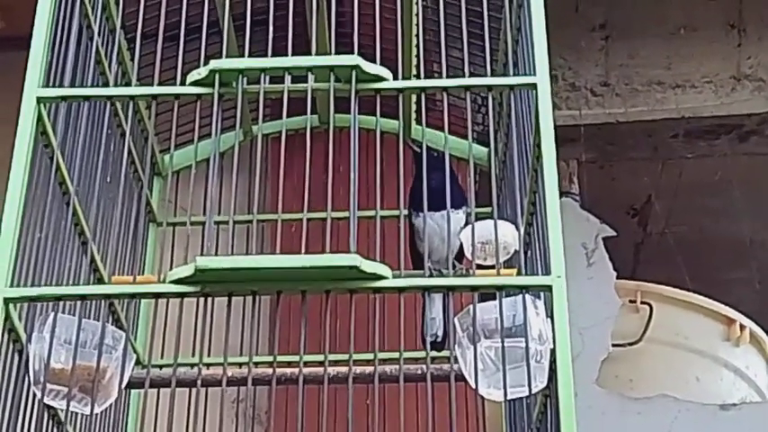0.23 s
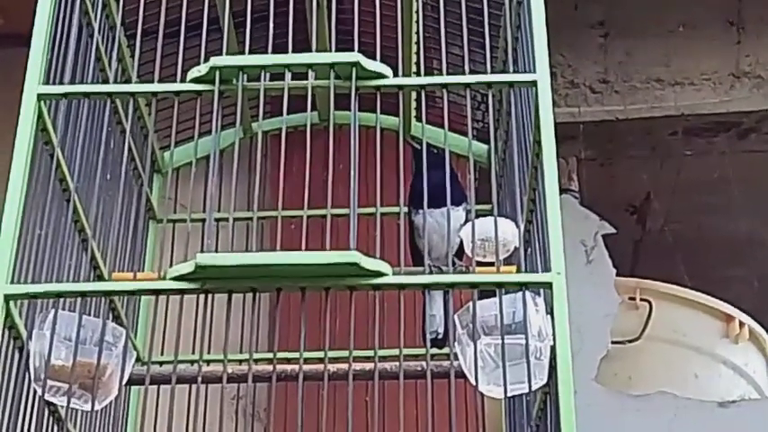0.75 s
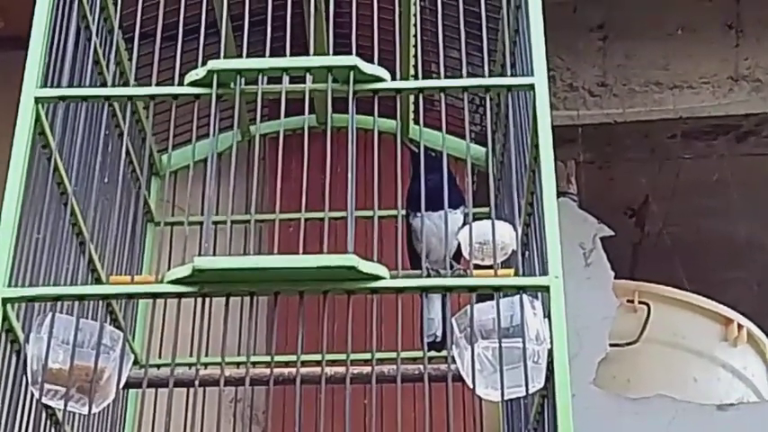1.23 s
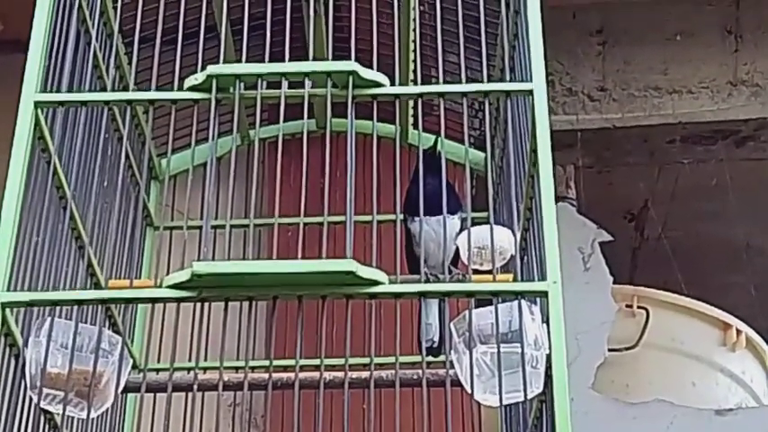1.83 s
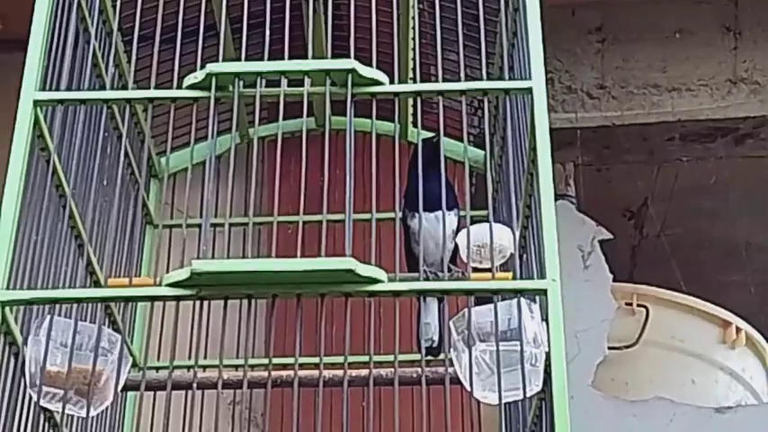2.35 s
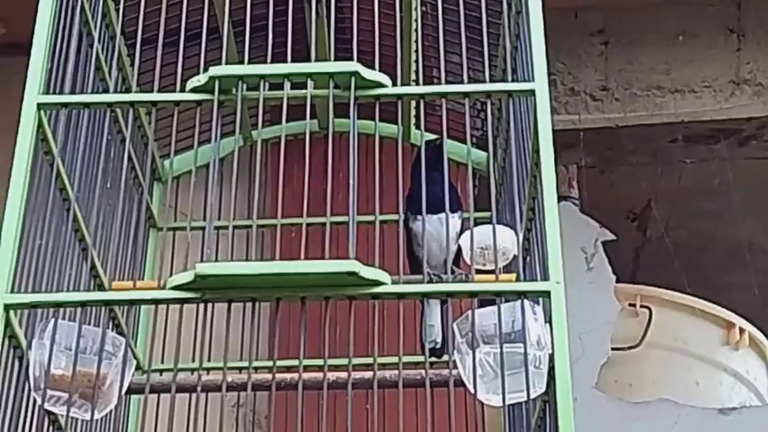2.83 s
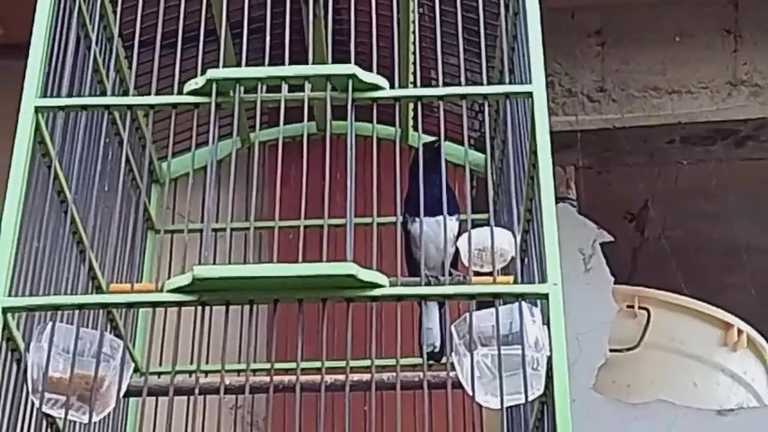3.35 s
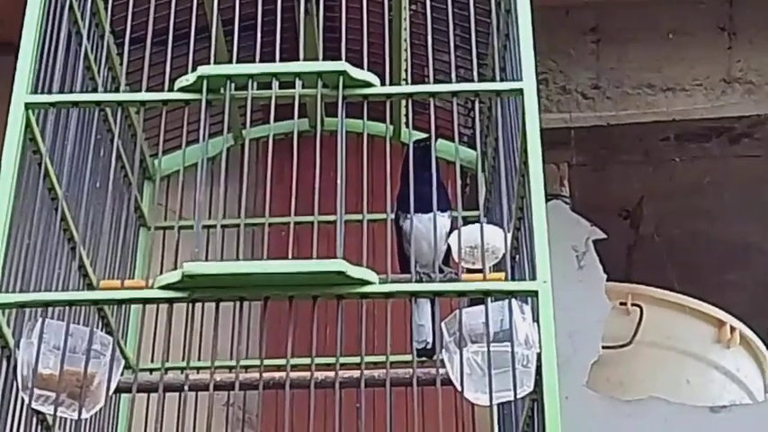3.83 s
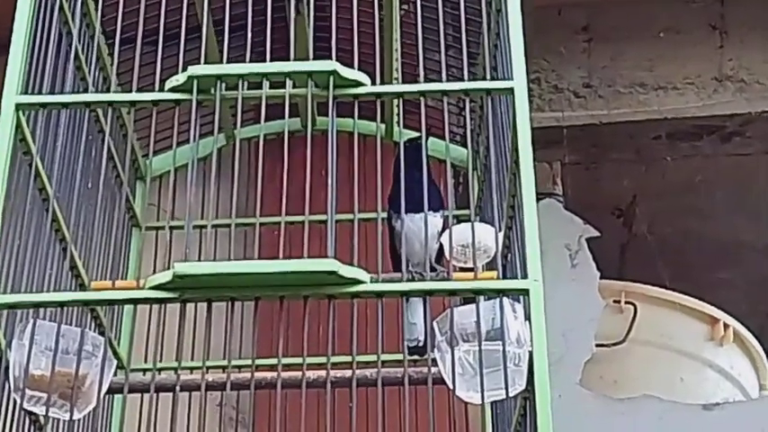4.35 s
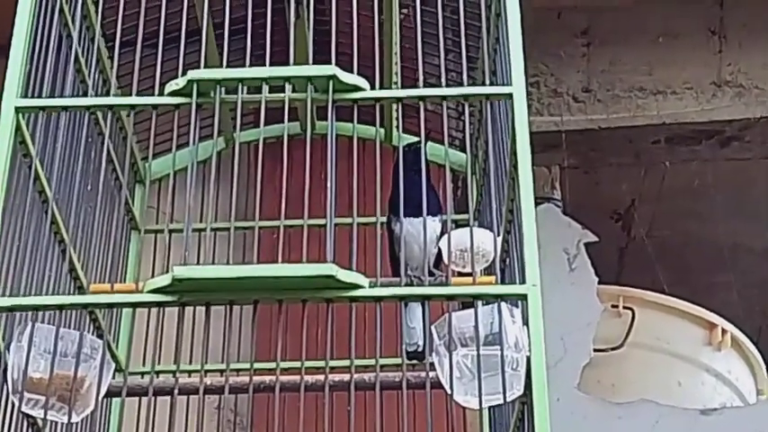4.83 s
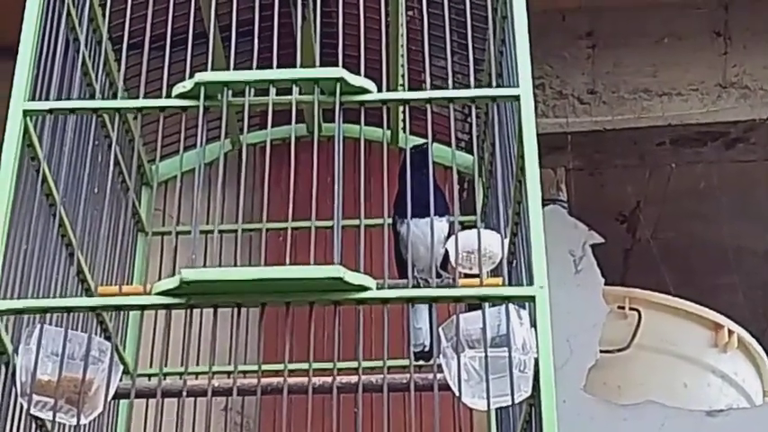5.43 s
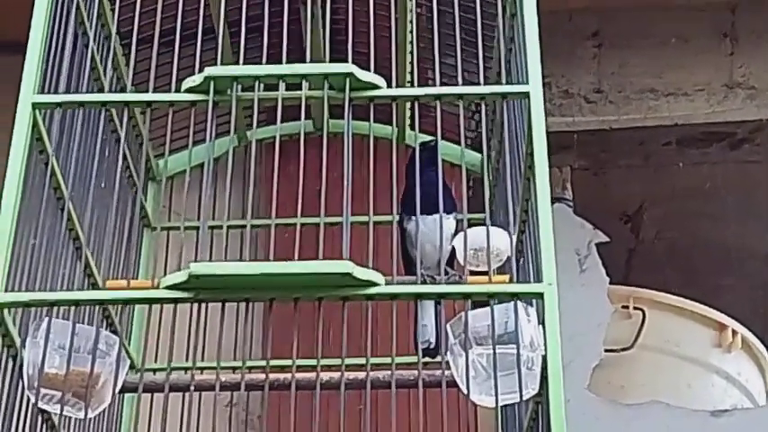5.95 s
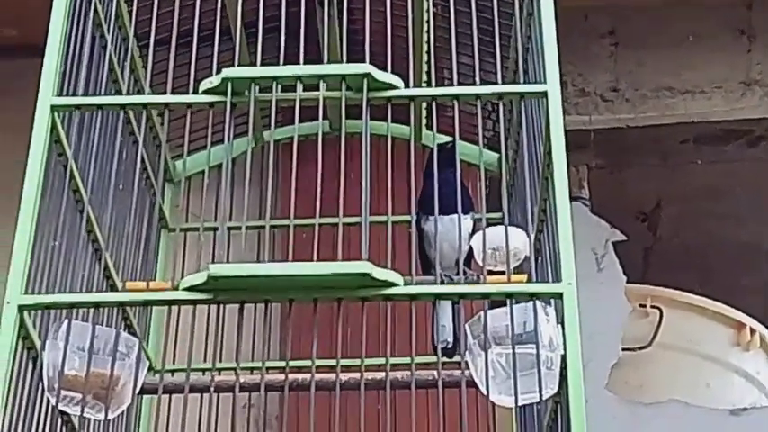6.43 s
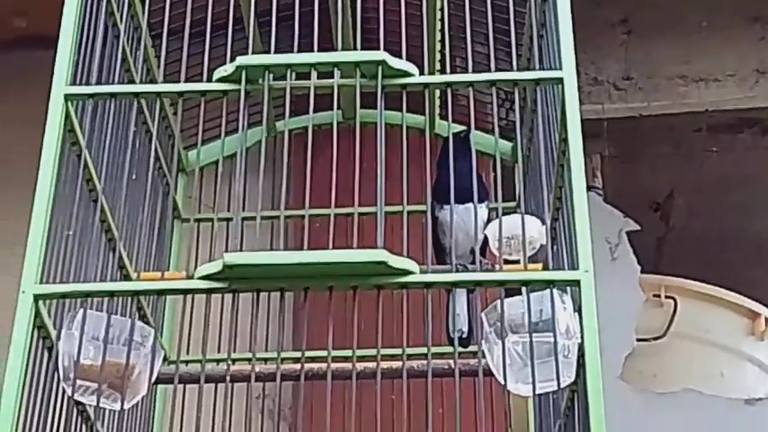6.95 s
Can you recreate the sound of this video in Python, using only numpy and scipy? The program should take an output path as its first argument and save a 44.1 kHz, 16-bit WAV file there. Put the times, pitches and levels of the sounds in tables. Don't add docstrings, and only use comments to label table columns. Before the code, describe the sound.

Water drips and far birds call softly, then a close bird bursts into piercing gliding whistles and warbles before quiet returns.

```python
import sys
import numpy as np
from scipy import signal
from scipy.fft import rfft, irfft
from scipy.io import wavfile
from scipy.ndimage import uniform_filter1d

SR = 44100
rng = np.random.default_rng(int(sys.argv[2]) if len(sys.argv) > 2 else 0)


def boost(x):
    u = np.asarray(x, float) / 20
    return 10 ** u


def wav_out(sig):
    wavfile.write(sys.argv[1], SR, np.round(np.clip(np.atleast_2d(sig).T, -1, 1) * 32767).astype(np.int16))


N = 317079


def rms_one(x):
    return x / np.sqrt(np.mean(x ** 2) + 1e-20)


def drift(rate_hz):
    r = np.exp(-2 * np.pi * rate_hz / SR)
    white = rng.standard_normal(N + SR)
    return rms_one(signal.lfilter([1], [1, -2 * r, r * r], white)[SR:])


def resonance(x, hz, width_hz):
    r = np.exp(-np.pi * width_hz / SR)
    poles = [1, -2 * r * np.cos(2 * np.pi * hz / SR), r * r]
    return signal.lfilter([(1 - r * r) / 2, 0, (r * r - 1) / 2], poles, x)


def double_resonance(x, hz, width_hz):
    return resonance(resonance(x, hz, width_hz), hz, width_hz)


def butter(x, order, hz, kind="low"):
    return signal.sosfilt(signal.butter(order, hz, kind, fs=SR, output="sos"), x)


def add(out, s, x):
    i = round(s * SR)
    out[i:i + len(x)] += x[:N - i]


def yard_noise():
    # frequency in Hz, density in dB per Hz.
    spectrum = [(25, -39), (165, -31.5), (190, -20), (345, -13), (600, -20.5), (1300, -24), (2600, -15.5),
                (3500, -23), (4300, -28), (6200, -28.5), (8600, -31.5), (9700, -41.5), (13000, -59.5),
                (15000, -46.5)]
    hz = np.arange(N // 2 + 1) * SR / N + 1
    point_hz, point_db = np.transpose(spectrum)
    colour = boost(np.interp(np.log(hz), np.log(point_hz), point_db))
    noise = rms_one(irfft(rfft(rng.standard_normal(N)) * colour, N))
    treble = butter(noise, 3, 3600, "high")
    patchy_db = 3 * drift(4.5)
    return noise + treble * (boost(patchy_db) - 1)


def far_chatter():
    out = np.zeros(N)
    for hz in (1500, 2100, 2600, 3050, 3300):
        out += double_resonance(rng.standard_normal(N), hz, 450) * boost(5 * drift(9))
    return rms_one(out)


def pump():
    hum = rms_one(resonance(rng.standard_normal(N), 340.7, 11))
    hum += .36 * rms_one(double_resonance(rng.standard_normal(N), 190, 14))
    return hum + .13 * rms_one(resonance(rng.standard_normal(N), 85, 70))


def background():
    hiss = rms_one(resonance(rng.standard_normal(N), 15100, 1300))
    return boost(-58.5) * yard_noise() + boost(-63.5) * far_chatter() + boost(-67.5) * pump() + boost(-81.5) * hiss


def cicada():
    # time in seconds, level in dB.
    swell = [(0.0, -59.5), (0.72, -59), (0.8, -68), (1.03, -68.5), (1.1, -58.5), (1.9, -60), (1.97, -65),
             (2.3, -61.5), (3.9, -58), (4.14, -67.5), (4.75, -59.5), (5.55, -62), (5.65, -61.5),
             (6.45, -58), (6.6, -68), (6.92, -59), (7.0, -59)]
    # frequency in Hz, width in Hz, level in dB.
    modes = [
        (7560, 330, 3.5),
        (7280, 1000, 1),
        (7790, 510, -4.5),
        (6920, 530, -17),
    ]
    t = np.arange(N) / SR
    burst_hz = 121 * (1 + .03 * drift(8))
    throb = 1 + .4 * np.sin(2 * np.pi * np.cumsum(burst_hz) / SR)
    clicks = rng.standard_normal(N) * throb
    body = sum(boost(db) * rms_one(double_resonance(clicks, hz, 2 * width)) for hz, width, db in modes)
    body = signal.sosfilt(signal.cheby1(8, 1, 8450, fs=SR, output="sos"), body)
    return boost(np.interp(t, *np.transpose(swell))) * rms_one(body)


def bubble(hz, db, slap, cycles):
    t = np.arange(len(slap)) / SR
    decay = boost(-60 * t * hz / cycles)
    ring = np.sin(2 * np.pi * hz * (t + 0.43 * t * t)) * decay
    return boost(db) * (ring + slap * np.exp(-t / .003))


def basin():
    # start in seconds, peak in dB, pitch in Hz.
    drips = [(0.056, -36.5, 1076), (0.476, -31, 817), (0.817, -36.5, 1002), (0.904, -36, 1820),
             (1.13, -32.5, 2150), (1.37, -43, 1770), (1.527, -41, 1830), (1.579, -36.5, 1740),
             (1.838, -43, 1435), (4.614, -35.5, 2326), (5.374, -29.5, 2300), (5.571, -43.5, 1523),
             (5.857, -27.5, 2470), (5.903, -37, 1930), (6.095, -45, 900), (6.13, -42, 1156),
             (6.532, -29, 1610), (5.532, -43.5, 1860), (5.665, -52, 930), (5.759, -51, 1520),
             (6.169, -43, 2340), (6.414, -42, 1300), (6.498, -42, 1490), (6.754, -39, 1930),
             (6.893, -36, 1127), (7.086, -40, 2180)]
    # start in seconds, level in dB, length in seconds, centre in Hz.
    splashes = [(0.062, -48, 0.12, 2790), (0.415, -51, 0.01, 3200), (0.478, -57, 0.092, 2750),
                (0.664, -57.5, 0.047, 2820), (0.722, -56.5, 0.02, 4930), (0.896, -56, 0.053, 2760),
                (1.47, -54.5, 0.02, 2930), (1.588, -60, 0.019, 4200), (1.884, -61.5, 0.017, 3970),
                (2.597, -55.5, 0.045, 1380), (2.9, -60, 0.027, 5500), (2.965, -45.5, 0.026, 1490),
                (5.006, -56.5, 0.035, 1106), (5.368, -49, 0.013, 2400), (5.763, -69, 0.11, 4200),
                (6.006, -60.5, 0.08, 4100), (6.196, -54, 0.027, 3100), (6.256, -58, 0.027, 4300),
                (6.3, -60, 0.037, 3400), (6.555, -57.5, 0.089, 4000), (6.958, -53, 0.016, 3900)]
    out = np.zeros(N)
    white = rng.standard_normal(N) * boost(2.4 * drift(170))
    slaps = rms_one(butter(white, 2, [700, 3600], "band"))
    for s, db, hz in drips:
        slap = (760 / hz) ** 1.5 * slaps[round(s * SR):][:4400]
        add(out, s, bubble(hz * .96, db - 5, slap, cycles=38.0))
    for when, pitch, size in rng.random((260, 3)):
        patter = bubble(900 * 4.5 ** pitch, -68 + 14 * size, 0.36 * slaps[:2000], cycles=30.0)
        add(out, when * N / SR, patter)
    for s, db, length, hz in splashes:
        t = np.arange(round(3 * length * SR)) / SR
        spray = rms_one(double_resonance(white[round(s * SR):][:len(t)], hz, 0.5 * hz))
        swell = np.clip(t / (.2 * length), 0, 1) * np.exp(-(t / length) ** 2)
        add(out, s, boost(db) * spray * swell)
    return butter(out, 3, [400, 6500], "band")


def whistles(notes, wobble, breath_db, reed_db):
    # multiple of the pitch, level in dB of a pure whistle, of a reedy note.
    upper_partials = [(3, -43.5, -20.5), (4, -51, -16.5), (5, -51, -32.5), (6, -65.5, -33.5),
                      (7, -70, -45.5), (8, -76, -45.5)]
    # pitch in Hz, level in dB.
    octave = [(1650, -23.5), (1950, -39), (2070, -52), (2300, -33.5), (2700, -48), (3000, -46), (3200, -63),
              (5500, -37.5)]
    # time in seconds, gain in dB.
    beak = [(2.1, -4), (2.35, -2.5), (2.52, 10), (2.56, -4), (3.0, 1), (3.1, 2.5), (3.2, 2), (3.3, 1),
            (3.55, -5.5), (3.58, -8.5), (3.68, -8), (3.84, 1.5), (3.9, -2), (4.03, 2), (4.25, 2),
            (4.55, -3.5), (4.75, -1), (4.95, -1)]
    sheen = np.tile(drift(18), 2)
    out, tremor = np.zeros(N), drift(130)
    air = resonance(rng.standard_normal(N), 270, 430)
    flutter = 1 + .45 * rms_one(air)
    for note in notes:
        s, hz, first_db, *given_db = np.transpose(note)
        if given_db:
            second_db = given_db[0]
        else:
            second_db = reed_db + 0.55 * first_db
            second_db = second_db + np.interp(hz, *np.transpose(octave))
            second_db = second_db + 0.59 * np.interp(s, *np.transpose(beak))
        n = np.arange(round(s[0] * SR), min(round(s[-1] * SR), N))
        curves = [np.interp(n / SR, s, c) for c in (hz, first_db, second_db)]
        hz, first_db, second_db = [uniform_filter1d(c, size=65, mode="nearest") for c in curves]
        phase = 2 * np.pi * np.cumsum(hz * (1 + wobble * tremor[n])) / SR
        reedy = np.clip((second_db - first_db + 25) / 22, 0, 1)
        grain = flutter[n]
        tone = boost(first_db) * np.sin(phase)
        tone += boost(second_db) * np.sin(2 * phase) * (1 + (grain - 1) * (1 - reedy))
        open_db = np.maximum(first_db, second_db) + np.interp(n / SR, *np.transpose(beak))
        for k, pure_db, reedy_db in upper_partials:
            k = round(k)
            dip_db = -16 * np.exp(-((k * hz - 6600) / 1200) ** 2)
            partial_db = open_db + dip_db + 3.5 * sheen[n + 997 * k]
            partial_db = partial_db + pure_db + reedy * (reedy_db - pure_db)
            tone += grain * boost(partial_db) * np.sin(k * phase) * (k * hz < 16500)
        tone *= 1 + boost(breath_db) * air[n]
        edge = np.clip(np.minimum(n - n[0], (n[-1] - n) / 5.6) / (0.00063 * SR), 0, 1)
        out[n] += np.sqrt(2) * edge * tone
    return out


def glides(rows, swell_db):
    return [[(s, first_hz, db), (s + length, last_hz, db + swell_db)]
            for s, length, first_hz, last_hz, db in rows]


def far_birds():
    # time in seconds, pitch in Hz, level in dB.
    neighbours = [
        [(0.2, 2150, -57.5), (0.33, 2623, -59), (0.4, 2606, -39.5), (0.43, 2510, -49.5), (0.45, 2180, -40)],
        [(5.15, 2014, -50), (5.25, 1906, -57), (5.3, 1563, -68)],
        [(5.8, 2466, -55), (5.83, 2262, -47.5), (5.9, 2388, -52), (5.95, 2070, -71)],
        [(.32, 2840, -47), (.345, 2515, -57), (.38, 2460, -34)],
        [(5.86, 2750, -62), (5.9, 2577, -48.5), (5.93, 2172, -46)],
    ]
    # time in seconds, pitch in Hz, level in dB.
    risers = [
        [(0.99, 1740, -54), (1.07, 2036, -50.5), (1.15, 2330, -43.5), (1.23, 2402, -41.5), (1.31, 2694, -39.5),
         (1.38, 2602, -57)],
        [(6.475, 1730, -57.5), (6.56, 1943, -49.5), (6.63, 2297, -41), (6.74, 2453, -46.5), (6.82, 2656, -42),
         (6.89, 2710, -57), (6.92, 2586, -64)],
    ]
    # time in seconds, pitch in Hz, first partial in dB, second partial in dB.
    hoarse = [
        [(3.48, 3030, -58.5, -65), (3.51, 2980, -46, -53), (3.545, 3020, -63, -50)],
        [(4.14, 2535, -40.5, -79), (4.2, 2820, -55, -59), (4.24, 2970, -27.5, -43)],
        [(6.36, 2944, -39, -60), (6.42, 2946, -39, -56.5), (6.47, 2614, -49, -51.5), (6.5, 2448, -50, -48),
         (6.55, 2610, -44.5, -48.5)],
        [(7.13, 2370, -51, -79), (7.16, 2600, -53.5, -64), (7.19, 2710, -40, -50)],
    ]
    # start in seconds, length in seconds, first Hz,
    # last Hz, level in dB.
    chirps = [(.001, .019, 1780, 1980, -50), (5.58, .035, 6800, 5000, -64), (5.82, .02, 5600, 4400, -66),
              (6.18, .09, 3270, 3200, -63), (6.77, .035, 6500, 4800, -66), (7.15, .04, 2300, 2250, -54),
              (5.75, .06, 4200, 4050, -66), (5.83, .06, 4450, 4000, -64), (6.05, .06, 4350, 4200, -65),
              (6.05, .08, 2850, 2500, -63), (5.97, .08, 2250, 2330, -60), (6.3, .09, 4350, 4250, -65),
              (6.66, .05, 4300, 4200, -66), (6.31, .04, 3050, 3300, -60), (6.99, .06, 2620, 2640, -60),
              (6.9, .05, 1050, 1350, -56), (.12, .06, 5200, 5600, -63)]
    calls = risers + neighbours + hoarse + glides(chirps, swell_db=-9)
    return butter(whistles(calls, wobble=0.0055, breath_db=-9, reed_db=-26.0), 1, 6500)


def legato(notes):
    out = []
    for note in sorted(notes):
        joined = False
        if out:
            start, end = note[0], out[-1][-1]
            meets = abs(start[0] - end[0]) < .004 and abs(start[1] / end[1] - 1) < .08
            joined = meets and len(start) == len(out[-1][0])
        if joined:
            out[-1] = out[-1] + [row for row in note[1:] if row[0] > end[0]]
        else:
            out.append(list(note))
    return out


def songbird():
    # time in seconds, pitch in Hz, level in dB.
    held = [
        [(2.056, 2660, -46.5), (2.075, 2518, -25), (2.12, 2655, -18.5), (2.165, 2826, -6.5), (2.25, 2750, -14),
         (2.32, 2692, -11), (2.38, 2589, -17), (2.44, 2430, -26), (2.485, 2168, -24)],
        [(3.085, 1856, -46.5), (3.097, 1903, -24.5), (3.11, 1990, -16.5), (3.13, 2064, -11),
         (3.195, 2080, -19.5), (3.205, 2050, -22)],
        [(3.268, 2260, -15), (3.28, 2570, -13), (3.29, 2614, 3.5), (3.3, 2440, -3.5), (3.32, 2546, -37.5),
         (3.35, 2540, -4), (3.41, 2636, -33.5), (3.445, 2660, -47.5)],
        [(4.452, 2540, -37.5), (4.47, 2600, -18), (4.58, 2798, -8), (4.64, 2686, -7), (4.7, 2630, -22.5),
         (4.8, 2525, -18.5), (4.85, 2418, -21), (4.9, 2281, -31), (4.935, 2329, -19.5)],
    ]
    # time in seconds, pitch in Hz, level in dB.
    flicks = [
        [(2.485, 2235, -31.5), (2.508, 2299, -23.5), (2.522, 2547, -20), (2.528, 3300, -15.5),
         (2.534, 3643, -7.5), (2.54, 3643, -10.5), (2.546, 3720, -10.5), (2.55, 3320, -13),
         (2.555, 2380, -21.5)],
        [(4.934, 2495, -34), (4.94, 2600, -28.5), (4.945, 3220, -6.5), (4.952, 3477, -12.5), (4.96, 3330, -9),
         (4.967, 3300, -27.5)],
        [(3.066, 2615, -49.5), (3.077, 2934, -31.5), (3.085, 3255, -32), (3.095, 3397, -33.5),
         (3.125, 3180, -36.5)],
        [(3.875, 2530, -22), (3.885, 2720, -10.5), (3.91, 2828, -5.5), (3.94, 2816, -11), (3.961, 2680, -7.5),
         (3.967, 2457, -20), (3.984, 2232, -32), (3.992, 2500, -14), (4.0, 2440, -26.5)],
        [(4.0, 2500, -22), (4.005, 2810, -15), (4.012, 3094, -17.5), (4.018, 3215, -6), (4.03, 3190, -3.5),
         (4.046, 3120, -6.5), (4.052, 2730, -5.5)],
        [(4.052, 2917, -13), (4.059, 2540, -20.5), (4.075, 2505, -16), (4.09, 2417, -18), (4.096, 2420, -13),
         (4.102, 2218, -18), (4.112, 1710, -33.5)],
    ]
    # time in seconds, pitch in Hz, level in dB.
    sweeps = [
        [(2.727, 3817, -26.5), (2.731, 3200, -2.5), (2.737, 2910, -6.5), (2.744, 2586, -7),
         (2.755, 2390, -18.5), (2.772, 2283, -27), (2.787, 2450, -7.5), (2.795, 1672, -24.5),
         (2.805, 1660, -29.5)],
        [(3.214, 1502, -57.5), (3.224, 1586, -33.5), (3.235, 1970, -27.5), (3.245, 1954, -18.5),
         (3.257, 2227, -23), (3.269, 2347, -32)],
        [(4.238, 3430, -36), (4.244, 4050, -15.5), (4.25, 4680, -24.5), (4.256, 5310, -18),
         (4.262, 5450, -22.5), (4.27, 5637, -22.5), (4.277, 5130, -21.5)],
        [(4.277, 5380, -26), (4.28, 4370, -22.5), (4.285, 3524, 0), (4.291, 2835, -6.5), (4.305, 2665, -9.5),
         (4.32, 2497, -11), (4.333, 2290, -24), (4.347, 2480, -9), (4.36, 2220, -32)],
    ]
    # time in seconds, pitch in Hz, first partial in dB, second partial in dB.
    reedy = [
        [(2.985, 1258, -46, -60), (2.999, 1500, -42, -46), (3.04, 1373, -35.5, -52.5), (3.07, 1337, -37.5, -31),
         (3.09, 1400, -35, -32.5), (3.105, 1350, -38.5, -33), (3.122, 1310, -37.5, -25)],
        [(3.54, 1447, -54, -19), (3.548, 1664, -33, -24), (3.56, 1667, -24.5, -19.5), (3.575, 1624, -29, -23.5),
         (3.581, 1520, -35.5, -9.5), (3.585, 1350, -27.5, -11.5)],
        [(3.586, 1696, -43, -36.5), (3.595, 1946, -17.5, -42.5), (3.603, 1836, -33.5, -34),
         (3.612, 1632, -25.5, -34), (3.622, 1560, -43, -20), (3.632, 1656, -28, -34.5)],
        [(3.634, 2600, -18.5, -60), (3.639, 3250, -4.5, -47), (3.643, 2800, -7.5, -33),
         (3.648, 2250, -15, -40.5), (3.654, 1870, -24.5, -29.5), (3.66, 1720, -35.5, -27.5)],
        [(3.66, 1720, -34.5, -24), (3.678, 1698, -26.5, -7.5), (3.686, 1600, -44.5, -24.5),
         (3.691, 1345, -52, -21.5), (3.695, 1663, -36.5, -17), (3.698, 1670, -32.5, -11.5),
         (3.703, 1677, -35.5, -22)],
        [(3.826, 1100, -55.5, -36), (3.836, 1400, -45, -21), (3.846, 1917, -34, -13.5),
         (3.855, 1720, -29.5, -17.5), (3.875, 1696, -30, -11.5), (3.882, 1410, -66.5, -28.5)],
    ]
    # time in seconds, pitch in Hz, level in dB.
    second_voice = [
        [(2.3, 2848, -51), (2.37, 3090, -51), (2.45, 3157, -59.5), (2.52, 3145, -27)],
        [(4.68, 3030, -47), (4.76, 3216, -56), (4.9, 3180, -70)],
    ]
    # start in seconds, length in seconds, first Hz, last Hz, level in dB.
    rasps = [
        (2.05, .035, 3150, 3100, -38),
        (2.058, .037, 1900, 1960, -42),
        (4.222, .016, 3700, 3470, -39.5),
        (4.452, .048, 3150, 2960, -41),
        (4.458, .025, 1980, 1833, -43),
        (4.44, .07, 6150, 6250, -52),
    ]
    phrase = legato(held + flicks + sweeps) + legato(reedy)
    song = whistles(phrase, wobble=0.0036, breath_db=-43.0, reed_db=0.5)
    rough = second_voice + glides(rasps, swell_db=-20)
    return song + whistles(rough, wobble=0.038, breath_db=-7.0, reed_db=-2.0)


def crackle():
    # start in seconds, length in seconds, level in dB, centre in Hz.
    crackles = [(2.527, 0.003, -37.5, 9000), (2.537, 0.00725, -45.5, 600), (2.728, 0.0044, -34, 9000),
                (2.73, 0.0103, -49.5, 400), (2.788, 0.0063, -45.5, 8500), (3.874, .012, -39.5, 6000),
                (3.893, 0.003, -46.5, 1000), (3.909, 0.004, -47, 900), (4.016, 0.03, -55, 60),
                (4.016, 0.03, -49, 900), (4.0925, 0.004, -42, 1500), (4.0925, .004, -50, 7000),
                (4.282, 0.0099, -33.5, 900), (4.282, 0.0069, -56, 280), (4.305, 0.004, -42, 1200),
                (4.349, 0.0017, -43, 1500), (4.931, 0.0048, -53.5, 7000)]
    out, noise = np.zeros(N), rng.standard_normal(N)
    for s, length, db, hz in crackles:
        window = signal.windows.tukey(round(length * SR))
        stretch = noise[round(s * SR) - 400:][:len(window) + 400]
        burst = resonance(stretch, hz, 1.2 * hz)[400:]
        add(out, s, boost(db) * window * rms_one(burst))
    return out


def yard_echo(x, direct_db, tail_db, t60):
    # delay in seconds, spread in seconds, level in dB.
    echoes = [
        (.004, 0.0071, -6),
        (.001, .003, -9),
        (0.012, 0.0042, -11),
        (0.02, 0.013, -13),
        (.052, 0.015, -17),
    ]
    t = np.arange(SR) / SR
    noise = rng.standard_normal(SR)
    dull = butter(noise, 2, 5000)
    tail = dull * boost(-60 * t / t60) + (noise - dull) * boost(-60 * t / (0.81 * t60))
    response = boost(tail_db) * tail * np.clip(t / 0.007, 0, 1) / np.sqrt(np.sum(tail ** 2))
    for delay, spread, db in echoes:
        hump = noise * np.exp(-((t - delay - spread) / (spread / 2)) ** 2)
        response += boost(db) * hump / np.sqrt(np.sum(hump ** 2))
    response[0] = boost(direct_db)
    return signal.fftconvolve(x, response)[:N]


def scene():
    water = yard_echo(basin(), direct_db=1, tail_db=-4, t60=.4)
    far = yard_echo(far_birds(), direct_db=-1.5, tail_db=0.0, t60=0.52)
    near = yard_echo(songbird(), direct_db=3.5, tail_db=-9.5, t60=0.47)
    return (background() + cicada() + water + far + near)[None]


def roll_off(x):
    return signal.sosfilt(signal.butter(12, 16110, fs=SR, output="sos"), x)


def record(dry):
    over_db = np.maximum(20 * np.log10(np.abs(dry[0]) + 1e-9) + 7.47, 0)
    slope = 150 * np.arange(N) / SR
    held_db = np.maximum.accumulate(over_db + slope) - slope
    attack = np.exp(-1 / (.0006 * SR))
    held_db = signal.lfilter([1 - attack], [1, -attack], held_db)
    held = dry * boost(-.85 * held_db) + crackle()
    mix = signal.sosfilt(signal.cheby2(10, 50, 16300, fs=SR, output="sos"), held)
    return roll_off(mix)


dry = scene()
out = record(dry)
wav_out(out)
```